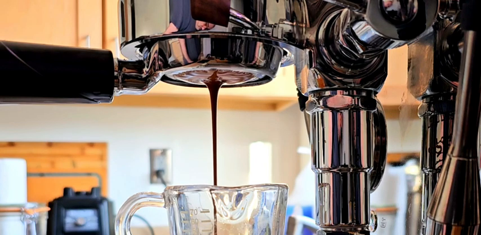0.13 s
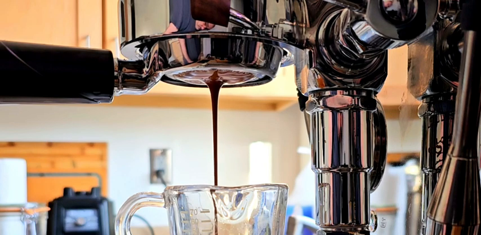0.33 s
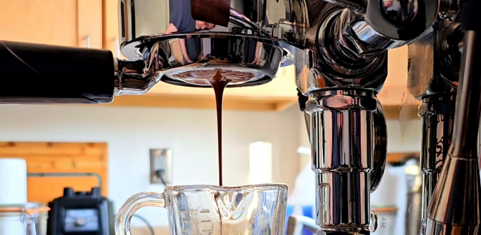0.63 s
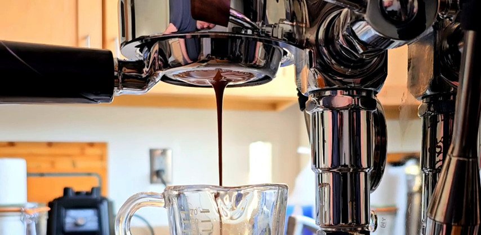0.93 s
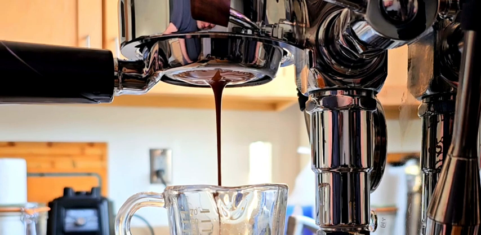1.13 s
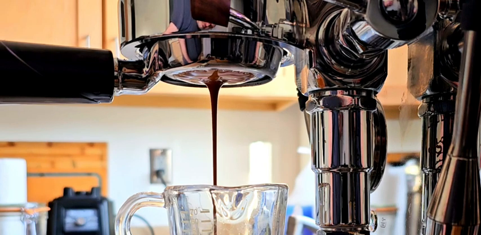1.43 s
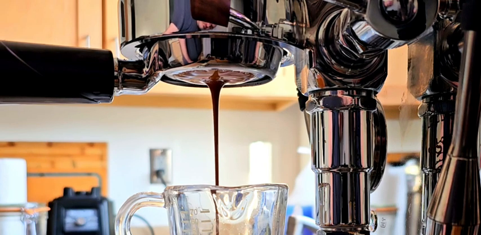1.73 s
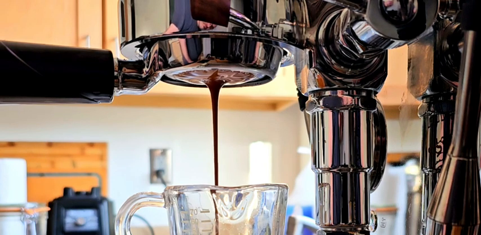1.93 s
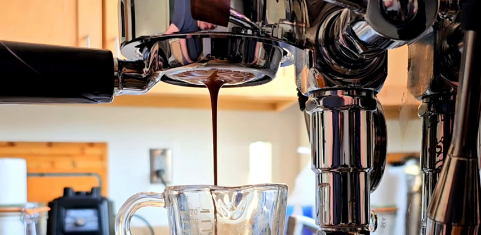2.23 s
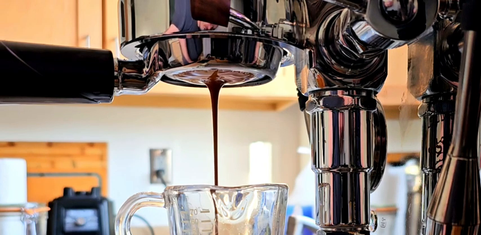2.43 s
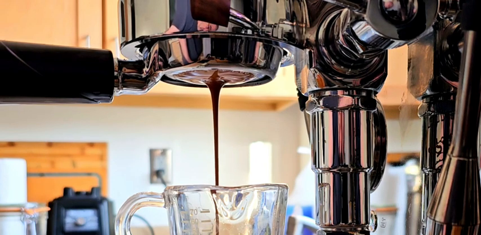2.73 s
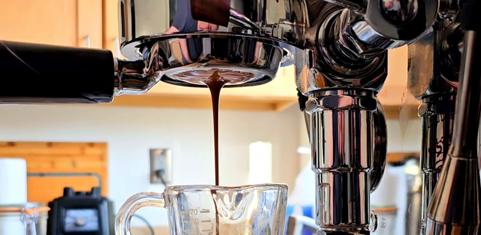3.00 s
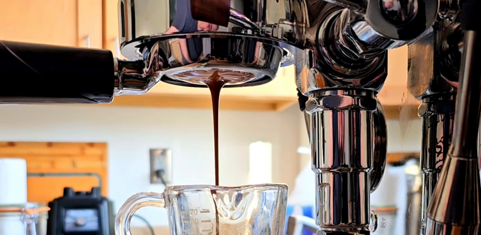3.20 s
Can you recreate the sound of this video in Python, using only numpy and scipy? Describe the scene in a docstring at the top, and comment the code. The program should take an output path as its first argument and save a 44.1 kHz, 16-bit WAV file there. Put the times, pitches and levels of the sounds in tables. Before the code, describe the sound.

An espresso machine's rotary pump hums steadily from 0 to 3.4 seconds, low and buzzy around 220 hertz, with thin metallic whine, water hiss and room rumble; a nearby higher hum sinks and fades by 1.9. Slightly left, faint ticks start immediately, creaks from 0.2, dull chatter 0.7-1.7, a thin high squeak 0.84-1.1. Sparse creaks follow, then tiny ticks and squeaks after 3.0. Close microphone, short kitchen tail.

```python
"""Kitchen, an espresso machine brewing close to a camera's two microphone ports. From the first moment its
four-vane rotary pump hums in shaft-locked tones, its casing rings in the treble with whine and hiss, water
hisses and frame and room drone and rumble, one tone sinking. To the left, ticks (mode clusters) start at once;
from 0.2 s slips ring a creaking body, from 0.7 s with a dull chatter; at 0.84 s a long arched squeak
(a gliding tone) begins, then short ones. The small sounds leave a short kitchen tail."""
import sys
import numpy as np
from scipy import signal
from scipy.fft import rfft, irfft, next_fast_len
from scipy.io import wavfile
from scipy.ndimage import uniform_filter1d, map_coordinates

SR = 44100
rng = np.random.default_rng(int(sys.argv[2]) if len(sys.argv) > 2 else 0)


def invert_db(x):
    """Field ratio 10**(x/20) for x, a level in decibels (scalar or array-like)."""
    u = np.asarray(x, float) / 20
    return 10 ** u


def wrap_up_sound(samples):
    """Save the sound to the file named by the first command line argument, as 16-bit audio."""
    columns = np.atleast_2d(samples).T
    # keep every value between -1 and 1, then stretch to whole-number steps
    tamed = np.clip(columns, -1, 1)
    steps = np.round(tamed * 32767).astype(np.int16)
    wavfile.write(sys.argv[1], SR, steps)


N = 148176
T = np.arange(N) / SR  # t/s

# Pump hum, multiples of the shaft rate: multiple, left level/dB, right level/dB, left lead/rad
SHAFT_ORDERS = [(1, -57, -57, -0.1), (2, -47, -46, -0.0), (4, -32, -33, -0.4), (6, -79, -62, -1.0),
                (7, -62, -67, -0.6), (8, -41, -42, -1.1), (9, -61, -60, -1.4), (10, -65, -62, -0.7),
                (11, -77, -68, -2.9), (12, -56, -53, 2.9), (13, -67, -72, -1.6), (14, -61, -55, 0.3),
                (15, -56, -58, 1.2), (16, -56, -52, 1.7), (17, -65, -73, -1.3), (18, -61, -62, -1.3),
                (19, -61, -63, -2.5), (20, -52, -53, -2.7), (21, -80, -71, 0.8), (22, -63, -73, -3.1),
                (23, -71, -61, 1.3), (24, -61, -55, -2.1), (25, -86, -74, 2.5), (26, -72, -70, -1.7),
                (27, -77, -75, -2.6), (28, -56, -62, -0.2), (29, -77, -77, 0.8), (30, -67, -79, 0.3),
                (31, -79, -81, -1.1), (32, -65, -81, -3.0), (34, -73, -96, 0.6), (36, -78, -73, -2.3),
                (37, -84, -73, 2.3), (38, -79, -84, -1.2), (39, -76, -91, 1.9), (40, -70, -74, -1.8),
                (43, -78, -82, 0.2), (44, -71, -80, -2.4), (45, -76, -81, 2.9), (48, -77, -76, 0.7),
                (49, -71, -79, 0.9), (51, -84, -79, -1.4), (52, -77, -77, -0.2), (53, -82, -77, -1.5),
                (56, -75, -79, 0.1), (58, -79, -80, 1.8), (60, -78, -85, -2.3)]
# Field of the pump motor: gain/1 of the steady part, of twice and of four times mains
MAINS_FIELD_GAINS = [.15, 1, .3]
# Resonances of the casing: f/Hz, width/Hz, gain to left port/dB, gain to right port/dB
CASING_MODES = [(4000, 500, -13, -15), (4750, 150, -13, -15), (6340, 150, -14, -14), (8500, 300, -11, -8),
                (9230, 150, -9, -5), (9900, 250, -5, -1), (10250, 180, -4, 1.5), (11500, 350, 1, 0),
                (11880, 200, -6, -6), (13550, 300, -3, -4), (14150, 250, -7, -8), (15450, 400, -7, -7)]
# Water hiss, spectrum before scaling to rms 1: f/Hz, density/dB
HISS_SPECTRUM = [(200, -15), (400, -16), (800, 2), (1100, -2.5), (1600, -4), (2000, -9.5), (3000, -10),
                 (5000, -10), (7000, -13.5), (9000, -11.5), (11000, -9), (12700, -11.5), (14600, -17),
                 (16000, -29)]
# Water hiss, slow swell, used as departure from its mean: t/s, level/dB
HISS_LEVEL = [(0.0, -60.5), (0.45, -61), (0.81, -60.5), (0.99, -60), (1.19, -60), (1.65, -60.5),
              (2.55, -61), (3.36, -60.5)]
# Water hiss, balance of the ports: f/Hz, left minus right/dB
HISS_BALANCE = [(300, -4), (1000, 15), (2400, 1.5), (4400, 1.5), (8000, 2.5), (15000, -12)]
# Noise arriving at both ports: f/Hz, left-right correlation/1
PORT_LIKENESS = [(60, 0.71), (200, 1), (500, 1), (1000, 0), (3000, 0), (15000, 0)]
# Low wavering tones of frame and room: f/Hz, level/dB, waver/dB
DRONE_TONES = [(52.25, -48, .8), (59, -50, 1), (73.25, -52, 2), (97.5, -52, 1.5), (120, -55, 2),
               (127.5, -56, 2), (135.25, -54, 2), (172.2, -62, 2), (195.2, -55, 2), (208.8, -56, 1.5),
               (240, -58, 1.5), (288.3, -56, 2), (328.8, -67, 1.5), (540.5, -68, 1.5), (568.8, -69, 1.5)]
# Tone that sinks towards the second vane tone and fades: t/s, f/Hz, level/dB
SINKING_TONE = [(0, 468.5, -46), (.35, 464, -45), (.75, 461.5, -46), (1, 460.5, -47), (1.35, 455, -51),
                (1.72, 457, -49), (1.9, 455, -64), (3.36, 455, -66)]
# Room rumble, spectrum before scaling to rms 1: f/Hz, density/dB
RUMBLE_SPECTRUM = [(20, -22), (35, -13), (65, -14), (87, -20), (110, -3), (140, -3), (165, -14), (260, -14),
                   (350, -21), (460, -18), (600, -28), (800, -60), (1300, -120)]
# Ticks to the left, level before the rise and the pan: t/s, level/dB, centre f/Hz
TICK_EVENTS = [(.028, -40, 12900), (.033, -50, 7300), (.27, -50, 10800), (.4, -57, 5100),
               (.404, -46, 15000), (.433, -52, 5300), (.505, -48.5, 4590), (.685, -49.5, 7160),
               (.9, -53, 7050), (1.079, -42, 7460), (1.416, -48, 3970), (1.558, -52, 8500),
               (1.659, -41, 4990), (1.686, -48, 4500), (1.71, -49.5, 5040), (1.721, -54, 4900),
               (1.734, -54, 5000), (1.8, -45, 7270), (3.017, -46, 8600), (3.138, -51, 5160),
               (3.28, -48.5, 5370)]
# Loud slips of the creak, relative level: t/s, level/dB, f/Hz
CREAK_SLIPS = [(.19, -48, 1900), (.209, -48, 2100), (.538, -47, 1900), (.782, -39, 1900), (.818, -42, 1950),
               (.855, -41, 1850), (.93, -47, 2100), (.96, -46, 1800), (1.071, -47, 1800),
               (1.205, -37, 1350), (1.336, -46, 1900), (1.416, -42, 1950), (1.43, -45, 1850),
               (1.461, -42, 1700), (1.6, -46, 1850), (1.656, -42, 1750), (1.686, -40, 1700),
               (2.34, -49, 1900), (2.71, -45, 1500)]
# Modes of the creaking body: pitch ratio/1, relative level/dB, t60/s
CREAK_MODES = [(.85, 1, .03), (1, 3.5, .032), (1.13, 0, .03), (1.63, -7, .022), (2.15, -11, .018)]
# Dull chatter of low slips, level before the rise and the pan: t/s, level/dB, f/Hz
CHATTER_COURSE = [(.72, -90, 800), (.75, -43, 810), (.95, -44, 770), (1.2, -45, 740), (1.5, -45, 710),
                  (1.7, -43, 690), (1.73, -90, 690)]
# Long arched squeak, level before flutter and pan: t/s, f/Hz, level/dB
SQUEAK_COURSE = [(0.84, 4033, -68), (0.884, 4205, -49), (0.898, 4234, -48), (0.918, 4303, -56),
                 (0.98, 4272, -55), (0.992, 4273, -49), (1.002, 4271, -59), (1.034, 4268, -66),
                 (1.04, 4245, -74), (1.046, 4136, -61), (1.074, 4110, -57), (1.078, 4111, -64),
                 (1.088, 4246, -52), (1.102, 4150, -63), (1.11, 3985, -59), (1.125, 3997, -61)]
# Short squeaks, level before fades, flutter and pan: t/s, length/s, f/Hz, level/dB
SHORT_SQUEAKS = [(.97, .015, 2950, -63), (1.132, .042, 3370, -61), (1.225, .012, 4050, -63),
                 (1.662, .012, 4800, -58), (1.663, .008, 3850, -56), (3.082, .02, 3780, -64),
                 (3.24, .035, 4250, -62), (3.305, .015, 4000, -65), (3.335, .03, 4150, -57)]


def unit(x):
    """Scale to rms 1."""
    return x / np.sqrt(np.mean(x ** 2) + 1e-20)


def along(points, hz):
    """Read (f/Hz, value) points on a log frequency axis."""
    f, value = np.transpose(points)
    return np.interp(np.log(hz + 1), np.log(f + 1), value)


def curves(rows):
    """One value per sample for each column after the time."""
    s, *columns = np.transpose(rows)
    return [np.interp(T, s, column) for column in columns]


def wobble(knots_per_s):
    """A smooth random curve through normally distributed knots, renewed every 64 samples."""
    knots = rng.standard_normal(200)
    place = np.minimum(T[::64] * knots_per_s, 190)
    return map_coordinates(knots, [place]).repeat(64)[:N]


def filtered(x, response):
    """Multiply the spectrum of x by a complex response of frequency."""
    m = next_fast_len(N + SR // 2)
    return irfft(rfft(x, m) * response(np.fft.rfftfreq(m, 1 / SR)), m)[..., :N]


def rush(spectrum, patchy_db):
    """Stereo noise of rms 1 with patches of random gain in time and frequency, partly alike at the ports."""
    z = signal.stft(rng.standard_normal((2, N + 512)), nperseg=512)[2]
    field = uniform_filter1d(rng.standard_normal(z.shape[1:]), size=6, axis=0)
    field = uniform_filter1d(field, size=10, axis=1)
    pair = signal.istft(z * invert_db(patchy_db * unit(field)), nperseg=512)[1][:, :N]

    def mid_side_gains(hz):
        turn = np.arccos(np.clip(along(PORT_LIKENESS, hz), -1, 1)) / 2
        return invert_db(along(spectrum, hz)) * [np.cos(turn), np.sin(turn)]

    mid, side = filtered(pair, mid_side_gains)
    return unit(np.array([mid + side, mid - side]))


def pair_tone(phase, left_lead):
    """A tone of rms 1 whose phase at the left leads by left_lead radians."""
    return np.sqrt(2) * np.cos(phase + np.array([[left_lead / 2], [-left_lead / 2]]))


def casing(hz):
    """Steep resonances of the casing, added in power, towards each microphone port."""
    power = 0
    for centre, width, left_db, right_db in CASING_MODES:
        power = power + invert_db([[left_db], [right_db]]) ** 2 / (1 + (2 * (hz - centre) / width) ** 4)
    return np.sqrt(power)


def through_casing(pair):
    """Two excitations, partly shared between the ports, ring the casing; rms 1."""
    share, left_lag_s = .65, .0002  # of the shared part
    late = filtered(pair[1], lambda hz: np.exp(-2j * np.pi * hz * left_lag_s))
    left = share * late + np.sqrt(1 - share ** 2) * pair[0]
    return unit(filtered(np.array([left, pair[1]]), casing))


def pump_hum(turns):
    """Each revolution repeats the pump's push, so the hum is a sum of multiples of the shaft rate."""
    waver_db, locked_orders = .6, 8  # higher multiples arrive with scattered phase
    hum = 0
    for k, left_db, right_db, left_lead in SHAFT_ORDERS:
        scatter = 2 * np.pi * (k > locked_orders) * rng.random()
        tone = pair_tone(2 * np.pi * k * turns + scatter, left_lead)
        hum = hum - invert_db([[left_db], [right_db]]) * invert_db(waver_db * wobble(8.72)) * tone
    return hum


def slot_whine(turns):
    """A random slot pattern, the same every turn, is modulated by the mains field and rings the casing."""
    mains_hz = 60
    one_turn = signal.resample(rng.standard_normal((2, 600)), 9600, axis=1)
    slots = one_turn[:, (turns % 1 * 9600).astype(int)]
    field = sum(g * np.cos(4 * np.pi * k * mains_hz * T) for k, g in enumerate(MAINS_FIELD_GAINS))
    return through_casing(slots * field)


def casing_hiss(vane_gate):
    """Flat noise, pulsed by the vanes and slightly unsteady, rings the casing."""
    noise = rush([(20, 0), (20000, 0)], patchy_db=1.0)
    return through_casing(noise * vane_gate * invert_db(0.25 * wobble(8.7)))


def water_hiss(vane_gate):
    """Turbulent water as broad noise, pulsed by the vanes, slowly swelling and weighted between the ports."""
    swell_db, = curves(HISS_LEVEL)
    noise = rush(HISS_SPECTRUM, patchy_db=2.0)
    hiss = filtered(noise, lambda hz: invert_db(np.outer([.5, -.5], along(HISS_BALANCE, hz))))
    return invert_db(swell_db - swell_db.mean()) * vane_gate * hiss


def pump():
    """One wandering shaft angle drives hum and slot whine; its four vanes a turn pulse both hisses."""
    shaft_hz, wander_turns, gate_depth = 56.108, .0005, .15
    whine_db, casing_hiss_db, water_hiss_db = -59, -59.5, -53
    turns = shaft_hz * T + wander_turns * wobble(4.1)
    vane_gate = 1 + gate_depth * np.cos(8 * np.pi * turns)
    treble = invert_db(whine_db) * slot_whine(turns) + invert_db(casing_hiss_db) * casing_hiss(vane_gate)
    return pump_hum(turns) + treble + invert_db(water_hiss_db) * water_hiss(vane_gate)


def drones():
    """Frame and room sound low tones that waver in level and phase."""
    lead_per_hz = -0.00096  # rad/Hz, negative: the right leads
    tones = 0
    for hz, db, waver_db in DRONE_TONES:
        level = invert_db(db + waver_db * wobble(4.28))
        phase = 2 * np.pi * (hz * T + rng.random()) + 0.45 * waver_db * wobble(4)
        tones = tones + level * pair_tone(phase, lead_per_hz * hz)
    return tones


def sinking_tone():
    """A single tone whose phase sums a falling frequency while its level wavers and fades."""
    hz, db = curves(SINKING_TONE)
    return invert_db(db + .7 * wobble(8)) * pair_tone(2 * np.pi * np.cumsum(hz) / SR, -.8)


def rumble():
    """The room's low noise, mostly alike at both ports."""
    return invert_db(-45) * rush(RUMBLE_SPECTRUM, patchy_db=1.5)


def ticks():
    """Each tick is a dense cluster of 30 short modes round its centre."""
    t60_s, log_width, rise_s = .03, .12, 0.00096
    out, t = np.zeros(N + SR), T[:SR // 20]
    for s, db, hz in TICK_EVENTS:
        spread = rng.standard_normal((30, 2))
        mode_hz = hz * np.exp(log_width * spread[:, :1])
        ring = np.sin(2 * np.pi * mode_hz * t + np.pi * spread[:, 1:]).sum(axis=0)
        out[round(s * SR):][:len(t)] += invert_db(db - 60 * t / t60_s) * unit(ring) * (1 - np.exp(-t / rise_s))
    return out[:N]


def creak():
    """Each loud slip rings the modes of a body at the slip's own pitch."""
    out, t = np.zeros(N + SR), T[:SR // 10]
    for s, db, hz in CREAK_SLIPS:
        ring = 0
        for ratio, mode_db, t60_s in CREAK_MODES:
            decay = invert_db(mode_db + rng.normal(0, 0.67) - 60 * t / t60_s)
            mode_hz = hz * ratio * rng.normal(1, 0.015)
            ring = ring + decay * np.sin(2 * np.pi * mode_hz * t)
        out[round(s * SR):][:len(t)] += invert_db(db - 4) * ring * (1 - np.exp(-t / .0006))
    return out[:N]


def chatter():
    """Irregular low slips, each a decaying tone, make a dull chatter that sinks in pitch."""
    slips_per_s, t60_s, rise_s = 70, .06, 0.0014
    out, t = np.zeros(N + SR), T[:SR // 10]
    level_db, body_hz = curves(CHATTER_COURSE)
    for s in np.cumsum(rng.uniform(.5, 1.5, 300)) / slips_per_s:
        i = min(int(s * SR), N - 1)
        decay = invert_db(level_db[i] + rng.normal(0, 2) - 60 * t / t60_s)
        ring = decay * np.sin(2 * np.pi * body_hz[i] * rng.normal(1, .05) * t)
        out[i:][:len(t)] += ring * (1 - np.exp(-t / rise_s))
    return out[:N]


def squeaks():
    """One long arched squeak and some short ones: tones roughened by a fast random flutter."""
    hz, db = curves(SQUEAK_COURSE)
    start, end = SQUEAK_COURSE[0][0], SQUEAK_COURSE[-1][0]
    fade = np.clip(np.minimum(T - start, end - T) / 0.0041, 0, 1)
    out = np.sqrt(2) * fade * invert_db(db) * np.sin(2 * np.pi * np.cumsum(hz) / SR)
    for s, length, hz, db in SHORT_SQUEAKS:
        fade = np.clip(3 * np.minimum(T - s, s + length - T) / length, 0, 1)
        out = out + np.sqrt(2) * invert_db(db) * fade * np.sin(2 * np.pi * hz * T)
    flutter_db = unit(uniform_filter1d(rng.standard_normal(N), size=200))
    return out * invert_db(flutter_db)


def room(x):
    """A short kitchen tail: decaying noise, different on each side, starting 200 samples late."""
    t60_s = .2
    tail = rng.standard_normal((2, SR // 3)) * invert_db(-60 * T[:SR // 3] / t60_s)
    tail = tail / np.linalg.norm(tail[0])
    return signal.fftconvolve(np.pad(x, (200, 0))[None], tail, axes=1)[:, :N]


def scene():
    """The machine, and to its left the small sounds, louder and one sample earlier at the left port."""
    left_over_right_db, room_db = 5, -9
    machine = pump() + drones() + sinking_tone() + rumble()
    near = ticks() + creak() + chatter() + squeaks()
    ports = np.array([near, np.pad(near, (1, 0))[:N]])
    ports = ports * invert_db([[left_over_right_db / 2], [-left_over_right_db / 2]])
    return machine + ports + invert_db(room_db) * room(near)


def roll_off(x):
    """The treble ends steeply here."""
    return signal.sosfilt(signal.butter(12, 15930, fs=SR, output="sos"), x)


def record(dry):
    """The two microphone ports as the camera stores them."""
    return roll_off(dry)


dry = scene()
out = record(dry)
wrap_up_sound(out)
```